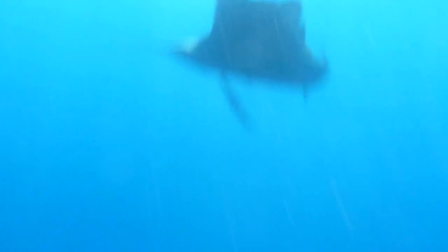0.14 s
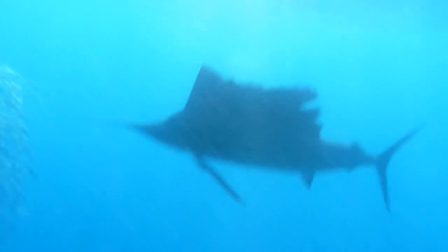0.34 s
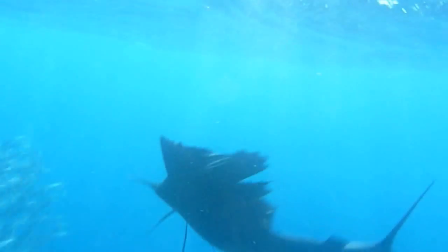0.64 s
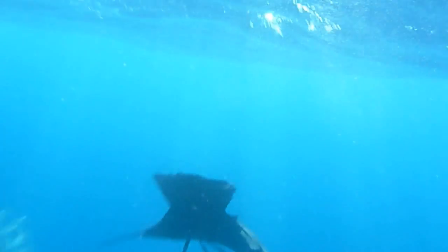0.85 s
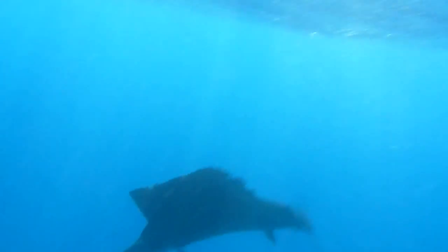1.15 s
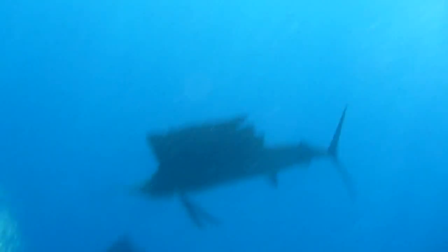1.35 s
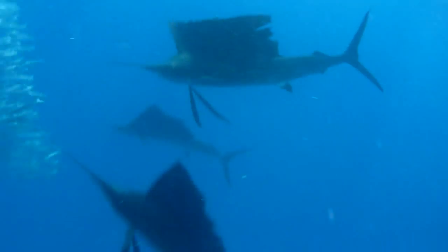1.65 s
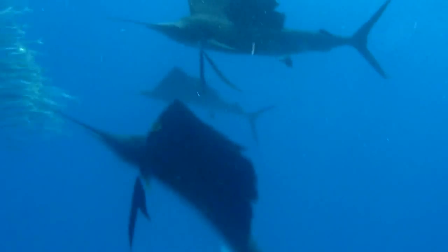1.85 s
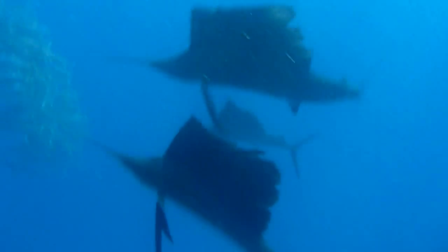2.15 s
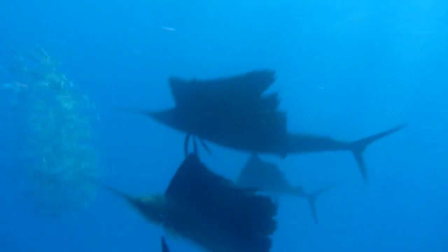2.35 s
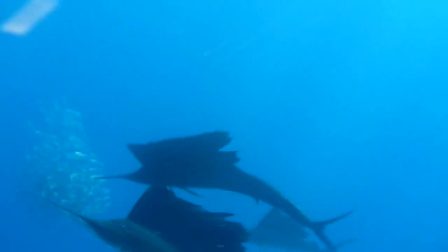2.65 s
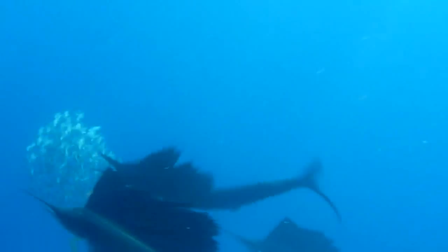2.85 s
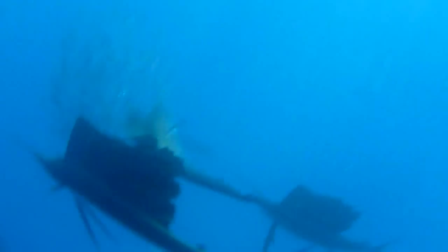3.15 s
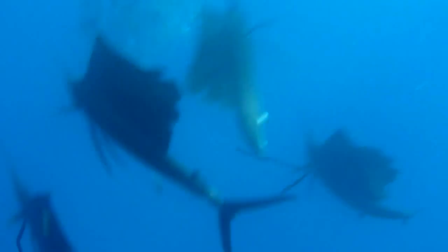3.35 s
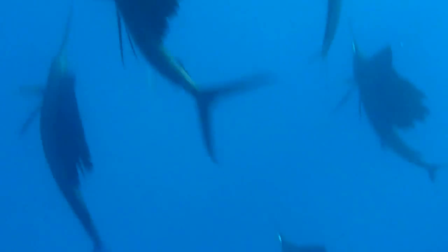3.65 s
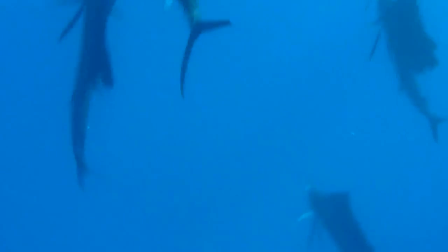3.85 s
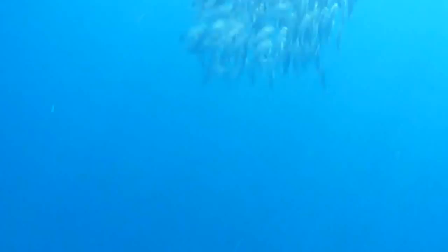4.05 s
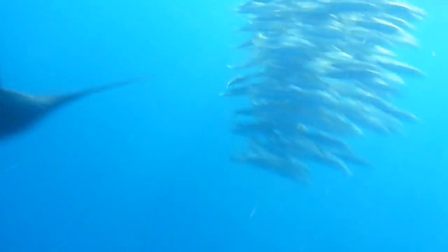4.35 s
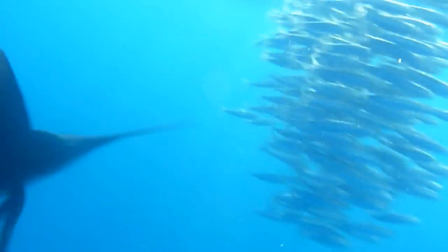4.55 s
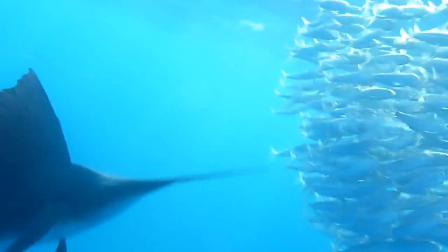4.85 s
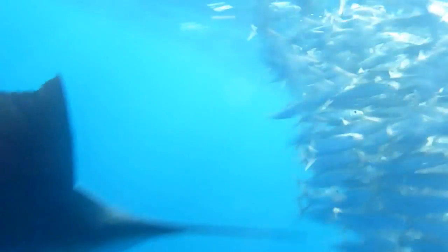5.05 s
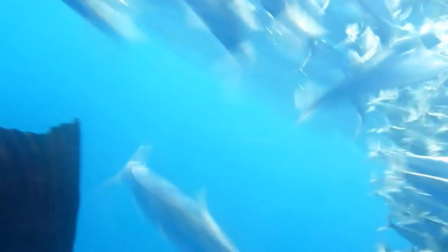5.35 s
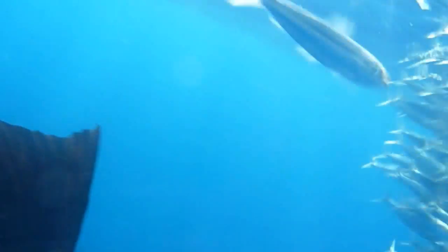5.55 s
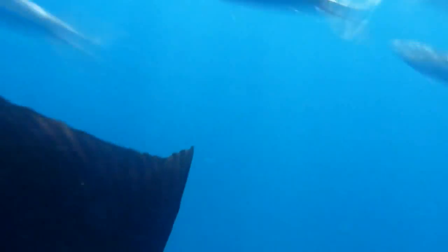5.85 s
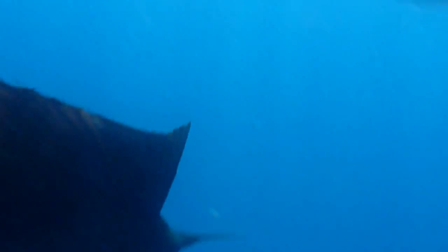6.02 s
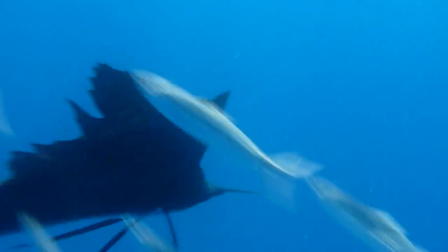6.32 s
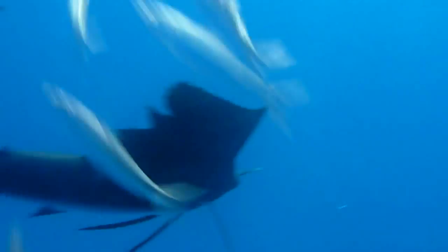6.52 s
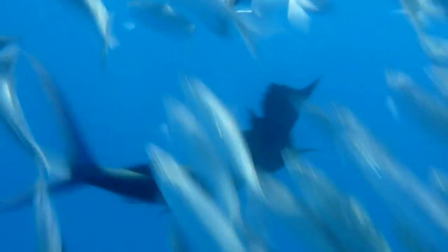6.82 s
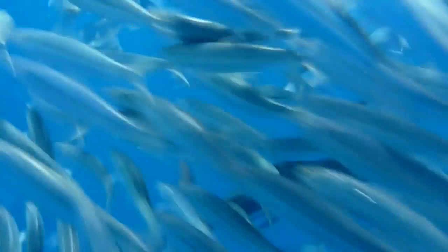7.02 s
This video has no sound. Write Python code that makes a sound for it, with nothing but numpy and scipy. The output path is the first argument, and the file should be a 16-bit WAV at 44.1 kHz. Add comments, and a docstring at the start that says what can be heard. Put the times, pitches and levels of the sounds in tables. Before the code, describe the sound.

Hollow boomy glugs and bubbles around a submerged camera case, with hard woody clacks, short gear whirrs and thin high motor screeches.

```python
"""Under open water: a camera in a plastic housing, its air booming near 385 Hz.
The shutter clacks, bounces and rewinds, and fingers tick on the case: shoves and noise ring its resonances.
The lens motor buzzes in stepped screeches; water gurgles and thumps as damped tones and filtered noise.
Thin noise flecks, hiss and a faint hum lie behind. The recorder turns its gain down after the loudest clacks."""
import sys
import numpy as np
from scipy import signal
from scipy.fft import rfft, irfft, next_fast_len
from scipy.io import wavfile
from scipy.ndimage import uniform_filter1d, map_coordinates

SR = 44100
rng = np.random.default_rng(int(sys.argv[2]) if len(sys.argv) > 2 else 0)


def generate_wav(sig):
    """Save sig (samples, or channels by samples) to the path in sys.argv[1] as 16-bit PCM at SR."""
    pcm = np.round(np.clip(np.atleast_2d(sig).T, -1, 1) * 32767).astype(np.int16)
    wavfile.write(sys.argv[1], SR, pcm)


N = 316638

# resonances of the housing's air and body: (centre [Hz], width [Hz], gain [dB])
BODY_MODES = [(163.2, 8.4, -5.5), (237.2, 42, -3.5), (387.5, 41.2, 2), (627, 190, -26.5)]
# low resonances under thumps and shoves: (centre [Hz], width [Hz], gain [dB])
DEEP_MODES = [(42, 5.5, 4.5), (95, 99, -5), (153.8, 23, 7.5), (242.5, 18, 8.5)]
# shutter rewinds: (gears engage [s], latch delay [s], engaging level [dB], latch level [dB])
REWINDS = [(1.0878, .0128, -15.5, -5), (2.9947, 0.022, -22.5, -8.5), (4.8934, .0149, -18, -6),
           (5.8452, .0145, -14.5, -4)]


def amp(db):
    """Gain of a level in dB."""
    return 10 ** (np.asarray(db) / 20)


def unit(x):
    """x at rms 1."""
    return x / np.sqrt(np.mean(x ** 2) + 1e-20)


def wobble(knots_per_s):
    """Smooth random curve through normally distributed knots."""
    knots = rng.standard_normal(int(N * knots_per_s / SR) + 4)
    return map_coordinates(knots, [np.arange(N) * knots_per_s / SR])


def filtered(x, response):
    """x times a complex response of frequency."""
    size = next_fast_len(N + SR)
    spectrum = rfft(x, size) * response(np.fft.rfftfreq(size, 1 / SR))
    return irfft(spectrum, size)[..., :N]


def through(x, modes):
    """x rings parallel second-order resonances of alternating sign."""
    def response(f):
        total = 0
        for k, (centre, width, db) in enumerate(modes):
            damping = 1j * f * width
            total = total + (-1) ** k * amp(db) * damping / (centre * centre - f * f + damping)
        return total
    return filtered(x, response)


def dull(x, hz):
    """x without its treble: three one-pole lowpasses."""
    return filtered(x, lambda f: 1 / (1 + 1j * f / hz) ** 3)


def colour(points):
    """Response through (frequency [Hz], level [dB]) points on a log axis."""
    f, db = np.transpose(points)
    return lambda hz: amp(np.interp(np.log(hz + 1), np.log(f), db))


def add(track, s, sound):
    """Lays a sound on a track at a time in s."""
    part = track[round(s * SR):][:len(sound)]
    part += sound[:len(part)]


def gate(start_s, end_s, edge_s):
    """1 between two times, with linear edges."""
    t = np.arange(N) / SR
    return np.clip(np.minimum(t - start_s, end_s - t) / edge_s, 0, 1)


def bubble(hz, t60_s, rise, attack_s):
    """Damped tone of peak envelope 1; its pitch climbs by the share rise per t60."""
    t = np.arange(SR // 10) / SR
    shape = amp(-60 * t / t60_s) * (1 - np.exp(-t / attack_s)) ** 2
    phase = 2 * np.pi * hz * (t + rise * t * t / (2 * t60_s))
    return np.sin(phase) * shape / shape.max()


def contacts():
    """Impacts of shutter, rewind and others: (time [s], thud, tick, edge levels [dB], thud t60 [s])."""
    # shutter releases: (opens [s], closes [s], bounce delay [s], bounce t60 [s],
    #                    opening level [dB], closing level [dB], bounce level [dB])
    shots = [(0.7214, 0.8669, .0068, 0.034, 3, 6.5, 6.5), (2.641, 2.7853, 0.0055, 0.0085, 3, 5.5, 3.5),
             (4.5822, 4.6759, .0067, 0.045, 4, 7, 5.5), (5.4956, 5.6409, 0.0056, 0.014, 2.5, 7, 8.5)]
    # other contacts: a second shutter bounce at 2.7954 s, finger ticks, loose parts:
    # (time [s], thud level [dB], tick level [dB], hard edge level [dB])
    others = [(0.3933, -16, -6.5, -48), (0.6793, -22, -4.5, -49), (0.949, -13.5, -3, -48),
              (1.0388, -21.5, -14, -45.5), (1.0683, -35, -9, -34), (2.2811, -26, -7, -37),
              (2.4888, -22, -3, -50), (2.571, -19.5, -9, -31), (2.603, -36, -14, -31),
              (2.7245, -24, -8.5, -47.5), (2.755, -15.5, -8, -47), (2.7954, 5.5, -4.5, -20.5),
              (2.8835, -16.5, -10, -48), (3.069, -23, -29, -28), (3.1406, -31, -38, -31),
              (3.948, -35, -7.5, -42), (4.557, -14.5, 1, -29), (4.8597, -15, -5, -44),
              (5.1442, -19.5, -10.5, -52), (5.2677, -18.5, -1, -50), (6.0606, -25, -13, -33),
              (6.1627, -22, -13, -38)]
    # colour of each contact: (tick over the thud [dB], hard edge over the thud [dB])
    opening, closing, bounce = (0, -15.5), (-4, -28), (-9, -32.5)
    engaging, latch = (11, -18), (-3, -21)
    opening_t60_s, closing_t60_s, latch_t60_s, other_t60_s = 0.016, 0.019, 0.019, 0.024
    steps = []
    for opens_s, closes_s, delay_s, bounce_t60_s, opening_db, closing_db, bounce_db in shots:
        steps.append((opens_s, opening_db, opening, opening_t60_s))
        steps.append((closes_s, closing_db, closing, closing_t60_s))
        steps.append((closes_s + delay_s, bounce_db, bounce, bounce_t60_s))
    for s, delay_s, engaging_db, latch_db in REWINDS:
        steps.append((s, engaging_db, engaging, other_t60_s))
        steps.append((s + delay_s, latch_db, latch, latch_t60_s))
    rows = [(s, db, db + tick_db, db + edge_db, t60_s) for s, db, (tick_db, edge_db), t60_s in steps]
    return rows + [(*row, other_t60_s) for row in others]


def clacks():
    """Each contact shoves the housing to and fro and rattles its shell: a woody tick and a hard edge."""
    # resonances of the thin shell: (centre [Hz], width [Hz], gain [dB])
    shell_modes = [(700, 130, -8.5), (967, 32.5, -1), (1267, 86, 2), (1605, 117, 1.5), (2110, 490, -5.5),
                   (2536, 430, -7), (3180, 180, -6), (3920, 450, -13), (5140, 320, -8.5),
                   (6600, 2300, -18.5)]
    shove, tick, edge = np.zeros(N), np.zeros(N), np.zeros(N)
    t = np.arange(SR // 20) / SR
    shove_hz, tick_t60_s, edge_t60_s = 345, 0.021, 0.047
    lead_s = 0.008  # the rattle creeps in early, as the parts start to move
    creep = np.where(t < lead_s, 0.28 * t / lead_s, 1)
    after_s = np.maximum(t - lead_s, 0)
    for s, thud_db, tick_db, edge_db, t60_s in contacts():
        add(shove, s, amp(thud_db - 60 * t / t60_s) * np.sin(2 * np.pi * shove_hz * t))
        rattle = rng.standard_normal((2, len(t))) * creep
        add(tick, s - lead_s, amp(tick_db - 60 * after_s / tick_t60_s) * rattle[0])
        add(edge, s - lead_s, amp(edge_db - 60 * after_s / edge_t60_s) * rattle[1])
    thuds = through(shove, BODY_MODES) + 0.1 * through(shove, DEEP_MODES[1:])
    woody = through(dull(tick, 900), shell_modes[:5])
    hard = dull(through(edge, shell_modes[2:]), 7500)
    return thuds + woody + hard


def rewind():
    """Gear teeth grind in quick grains while the body shakes; it swings back after the latch."""
    # gear train resonances: (centre [Hz], width [Hz], gain [dB])
    gear_modes = [(920, 810, -6.5), (1290, 350, 0.5), (1660, 220, -2), (1907, 130, 0.5), (2280, 150, -5),
                  (3260, 175, -4.5), (3750, 170, -12), (5300, 1100, -18)]
    rewind_s, gears_db, shake_db = 0.06, -43.5, -30.5
    rebound_s, rebound_db, rebound_hz, rebound_t60_s = 0.0143, -23, 224, 0.056  # dB relative to the latch
    starts_s = [s - 0.005 for s, *_ in REWINDS]
    gears_gate = sum(gate(s, s + rewind_s, 0.007) for s in starts_s)
    shake_gate = sum(gate(s, s + rewind_s, 0.022) for s in starts_s)
    grains = rng.standard_normal(N) * amp(5.2 * wobble(300))
    gears = unit(through(through(grains, gear_modes), gear_modes))  # twice: narrow bands, dark between
    shake = unit(through(rng.standard_normal(N) * amp(3.6 * wobble(90)), BODY_MODES))
    back = np.zeros(N)
    for s, delay_s, _, latch_db in REWINDS:
        swing = bubble(rebound_hz, rebound_t60_s, 0, 0.0029)
        add(back, s + delay_s + rebound_s, amp(latch_db + rebound_db) * swing)
    return back + amp(gears_db) * gears_gate * gears + amp(shake_db) * shake_gate * shake


def focus():
    """Every lens motor step gives the same short screech, with some noise; every other one lasts longer."""
    # motor runs: (start [s], end [s], level [dB])
    runs = [(0.389, 0.761, -53), (0.837, 0.862, -57), (1.4, 1.568, -53.5), (1.589, 1.597, -58),
            (3.891, 4.066, -53.5), (4.303, 4.661, -50.5), (5.291, 5.45, -53)]
    # partials of the screech and bands of its noise: (centre [Hz], width [Hz], level [dB])
    screech = [(5800, 40, -13), (9170, 190, -15), (10000, 170, -11), (10820, 200, -2.5), (11600, 200, -1.5),
               (12200, 200, -8), (13050, 180, -14)]
    step_hz, slip_s = 86.5, 1.2e-5
    out, noise = np.zeros(N), unit(through(rng.standard_normal(N), screech))
    for start_s, end_s, db in runs:
        turn = np.arange(round((end_s - start_s) * SR)) / SR * step_hz  # in steps
        phase = turn % 1
        width = 0.5 + 0.08 * (np.floor(turn) % 2)
        burst = np.clip(np.minimum(phase, width - phase) / 0.058, 0, 1)
        late_s = slip_s * rng.standard_normal(64)[turn.astype(int)]  # each step slips a little
        step_s = phase / step_hz + late_s
        tone = unit(sum(amp(level) * np.sin(2 * np.pi * hz * step_s) for hz, _, level in screech))
        run_noise = noise[round(start_s * SR):][:len(turn)]
        add(out, start_s, amp(db) * (0.45 * burst * tone + (0.18 + 0.27 * burst) * run_noise))
    return out


def glugs():
    """Glugs and clear bubbles are damped tones of climbing pitch; they also ring the housing."""
    # glugs: (time [s], level [dB], pitch [Hz], t60 [s])
    glug_rows = [(0.102, -22.5, 379, 0.042), (0.123, -28, 407, 0.085), (0.196, -25, 395, 0.04),
                 (0.265, -29, 431, 0.034), (0.433, -31, 428, 0.046), (0.55, -25.5, 399, .042),
                 (0.765, -37, 398, .07), (1.14, -32.5, 416, .069), (1.285, -24, 396, 0.049),
                 (1.32, -31.5, 397, 0.056), (1.365, -20.5, 364, 0.045), (1.513, -16.5, 377, 0.049),
                 (1.629, -16, 382, 0.038), (1.785, -14, 395, 0.027), (1.828, -15, 389.5, 0.048),
                 (2.117, -18.5, 383.5, 0.046), (3.103, -18, 370, 0.023), (3.122, -24.5, 357, 0.059),
                 (3.143, -22.5, 377, 0.047), (3.159, -25.5, 403, .05), (3.18, -28.5, 380.4, .14),
                 (3.413, -17, 413, 0.03), (3.454, -26.5, 370, 0.058), (3.534, -28.5, 374, 0.065),
                 (3.705, -32.5, 354, 0.046), (3.815, -23.5, 367, 0.057), (3.878, -24.5, 345, 0.03),
                 (3.922, -23.5, 348, 0.03), (4.013, -27, 413, 0.043), (4.142, -26.5, 390, 0.025),
                 (4.545, -25.5, 400, 0.02), (4.631, -27.5, 400, 0.027), (5.515, -28.5, 417, 0.046),
                 (5.585, -35, 403, 0.04), (5.555, -32, 447, 0.042), (6.291, -30.5, 341, 0.063),
                 (6.392, -24.5, 363, 0.057), (6.414, -17.5, 372, 0.057)]
    # single clear bubbles: (time [s], level [dB], pitch [Hz], t60 [s])
    bubble_rows = [(2.394, -40, 716, 0.04), (2.455, -38, 596, .072), (2.481, -30.5, 493, 0.025),
                   (2.755, -44, 668, 0.063), (3.076, -24.5, 531, .055), (3.535, -39.5, 570, 0.044),
                   (4.238, -27.5, 608, 0.027), (5.765, -24, 570, 0.098), (6.663, -22.5, 534, 0.022),
                   (6.694, -35, 586, 0.046), (6.722, -28.5, 510, 0.051), (6.891, -33.5, 458, 0.081)]
    # tiny high bubbles: (time [s], level [dB], pitch [Hz])
    pip_rows = [(1.01, -50, 1200), (2.4668, -47, 1200), (2.6955, -47, 1690), (5.9434, -48, 1660),
                (6.0116, -51, 1640), (6.311, -48, 1720), (6.504, -51, 1660), (6.8344, -50, 1630),
                (6.9112, -49, 2220), (6.9466, -49, 1740), (7.1455, -44, 1680)]
    glug_rise, bubble_rise, attack_share = 0.11, 0.33, 0.078  # attack as a share of the t60
    # each glug starts with a higher bubble, fainter if the glug lasts longer
    neck_db, neck_db_per_s, neck_hz, neck_t60_s = -5.5, -200, 495.6, 0.046
    tones = np.zeros(N)
    for s, db, hz, t60_s in glug_rows:
        add(tones, s, amp(db) * bubble(hz, t60_s, glug_rise, attack_share * t60_s))
        neck = bubble(neck_hz, neck_t60_s, bubble_rise, 0.0016)
        add(tones, s, amp(db + neck_db + neck_db_per_s * t60_s) * neck)
    for s, db, hz, t60_s in bubble_rows:
        add(tones, s, amp(db) * bubble(hz, t60_s, bubble_rise, 0.0012))
    for s, db, hz in pip_rows:
        add(tones, s, amp(db) * bubble(hz, 0.024, 0.03, 0.001))
    return tones + 0.2 * through(tones, BODY_MODES)


def thumps():
    """Dull thumps of water on the case: 2 ms pushes ring the low resonances."""
    # (time [s], level [dB])
    thump_rows = [(1.466, -18.5), (2.206, -24.5), (2.568, -22), (2.726, -20.5), (2.884, -15.5),
                  (3.37, -24.5), (3.949, -15.5), (6.162, -23.5), (6.466, -22)]
    push = np.zeros(N)
    for s, db in thump_rows:
        add(push, s, amp(db) * np.hanning(90))
    return through(push, DEEP_MODES)


def gurgle():
    """Random small bubbles over lumpy noise in the housing's resonances and a low wash."""
    # level curves: (time [s], boom [dB], low wash [dB], small bubbles [dB])
    levels = [(0.0, -40.5, -58, -52), (0.38, -46, -52.5, -66), (0.66, -39, -50, -60.5),
              (0.92, -53.5, -46.5, -56.5), (1.32, -40, -57.5, -55.5), (1.5, -34.5, -46, -51.5),
              (1.66, -38.5, -53, -51.5), (1.98, -39, -61, -53), (2.18, -41, -58, -51.5),
              (2.42, -47.5, -49, -55), (2.64, -41, -44.5, -49), (2.88, -55, -56, -52.5),
              (3.06, -36.5, -51, -55), (3.2, -35, -57, -41), (3.34, -35, -61.5, -55),
              (3.68, -42.5, -54.5, -54), (4.06, -36, -56.5, -53), (4.28, -46.5, -51.5, -51),
              (4.62, -44, -53, -54), (4.74, -47, -49, -53), (5.12, -46.5, -55.5, -56.5),
              (5.42, -51, -49, -63), (5.7, -49.5, -47, -52), (5.88, -43, -54, -53),
              (6.14, -51.5, -52.5, -59.5), (6.46, -39.5, -58.5, -57), (6.98, -48, -61.5, -55.5),
              (7.18, -39.5, -51, -61)]
    times_s, *columns = np.transpose(levels)
    boom_db, wash_db, small_db = [np.interp(np.arange(N) / SR, times_s, c) for c in columns]
    small = np.zeros(N)
    for when, size, spread in rng.random((700, 3)):
        hz = 460 * 1.45 ** (spread ** 1.566)
        add(small, when * N / SR, amp(9 * size) * bubble(hz, 30 / hz, 0.1, 0.006))
    lumps = amp(2.6 * wobble(28) + 1.2 * wobble(9))
    lumpy = through(lumps * rng.standard_normal(N), [(426.6, 123, 0)])
    boom = unit(through(lumpy, BODY_MODES))
    low = through(rng.standard_normal(N) * amp(2.5 * wobble(15)), [(193, 110, 0)])
    wash = unit(through(low, [(158.0, 44, -4), (247, 57, -6.5)]))
    return amp(boom_db) * boom + amp(wash_db) * wash + amp(small_db) * unit(small)


def flecks():
    """Faint, very short high flecks of noise, a few ms around a pitch each."""
    # (time [s], level [dB], pitch [Hz])
    fleck_rows = [(.258, -52, 4750), (2.097, -44, 3180), (3.068, -44, 3570), (3.073, -54, 9900),
                  (4.152, -60, 10930), (5.601, -49.5, 9900), (6.011, -56, 12300), (6.139, -57, 12400),
                  (6.555, -54, 5800)]
    out, t = np.zeros(N), np.arange(SR // 80) / SR
    for s, db, hz in fleck_rows:
        fuzz = unit(uniform_filter1d(rng.standard_normal(len(t)), size=30))
        add(out, s, amp(db - 60 * t / 0.042) * fuzz * np.sin(2 * np.pi * hz * t))
    return out


def floor():
    """Smooth coloured hiss and a faint hum of steady pitch, its level wavering slightly."""
    # hiss spectrum: (frequency [Hz], relative density [dB])
    hiss_points = [(20, -24.5), (85, -24), (147, -21), (276, -17), (393, -3.5), (503, -21), (845, -23),
                   (1670, -25.5), (5560, -36.5), (7120, -40), (10400, -41.5), (13500, -53.5)]
    # (frequency [Hz], level [dB])
    hum_hz, hum_db = (140, -56.5)
    hiss = unit(filtered(rng.standard_normal(N), colour(hiss_points)))
    hum = amp(hum_db + 1.4 * wobble(8.9)) * np.sin(2 * np.pi * hum_hz * np.arange(N) / SR)
    return amp(-49.5) * hiss + hum


def scene():
    """Sum of all sources, one channel."""
    water = glugs() + thumps() + gurgle()
    return (clacks() + rewind() + focus() + water + flecks() + floor())[None]


def record(dry):
    """Peaks over a threshold pull the gain down within ms; it climbs back at a steady rate in dB."""
    # recorder's frequency response, a notch near 8 kHz and a steep top edge: (frequency [Hz], gain [dB])
    response_points = [(7000, 0), (7900, -12.5), (8700, -3), (13700, -1), (14100, -8.5), (14800, -19.5),
                       (15700, -15)]
    threshold_db, cut_per_db, release_db_per_s, smooth_s, top_hz = -6.2, 1.31, 9, 0.012, 15750
    release_db = release_db_per_s * np.arange(N) / SR
    over_db = np.maximum(20 * np.log10(np.abs(dry[0]) + 1e-9) - threshold_db, 0)
    held_db = np.maximum.accumulate(cut_per_db * over_db + release_db) - release_db
    keep = np.exp(-1 / (smooth_s * SR))
    cut_db = signal.lfilter([1 - keep], [1, -keep], held_db)
    response = colour(response_points)
    return filtered(dry * amp(-cut_db), lambda hz: response(hz) * (hz < top_hz))


dry = scene()
out = record(dry)
generate_wav(out)
```